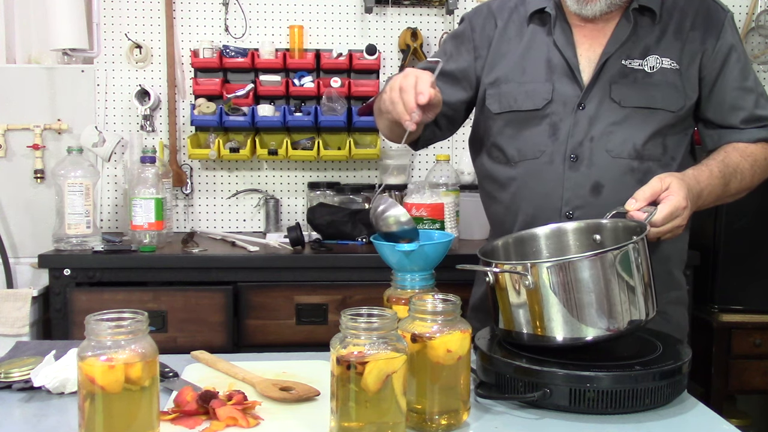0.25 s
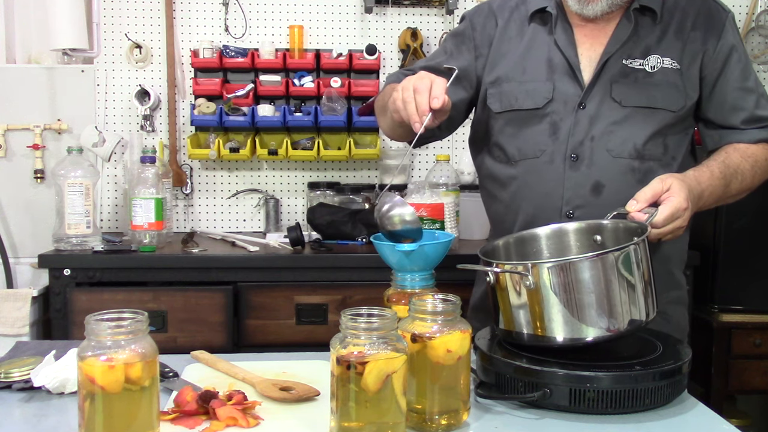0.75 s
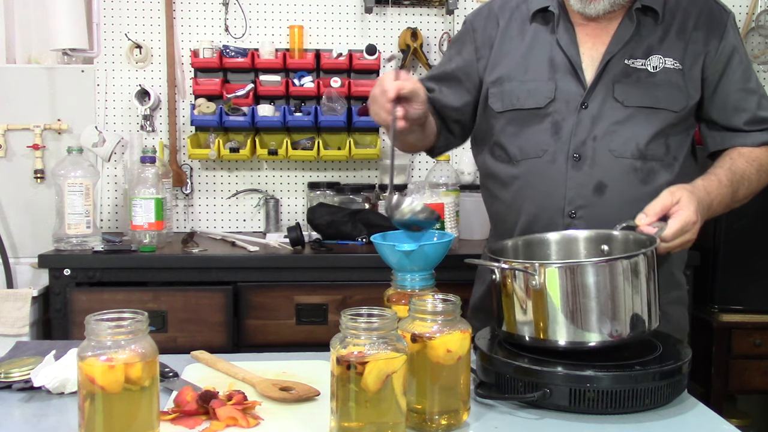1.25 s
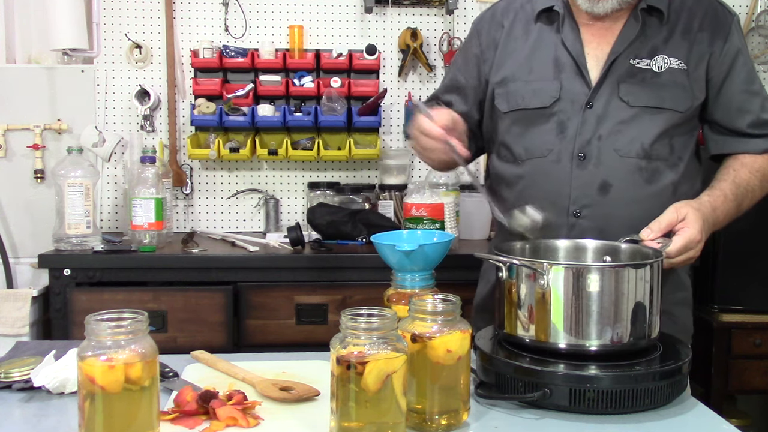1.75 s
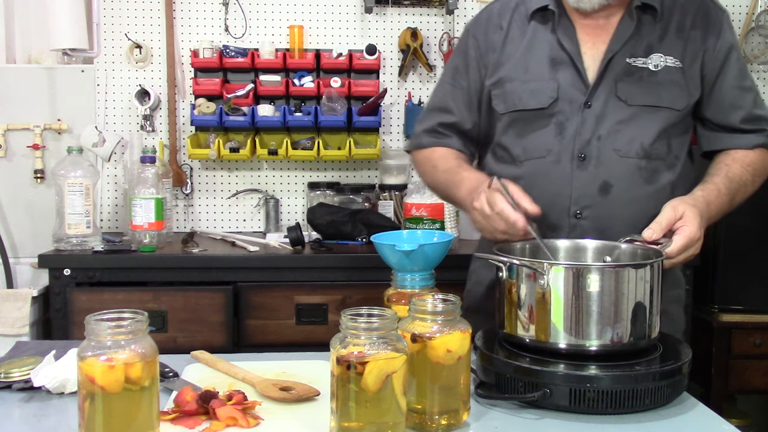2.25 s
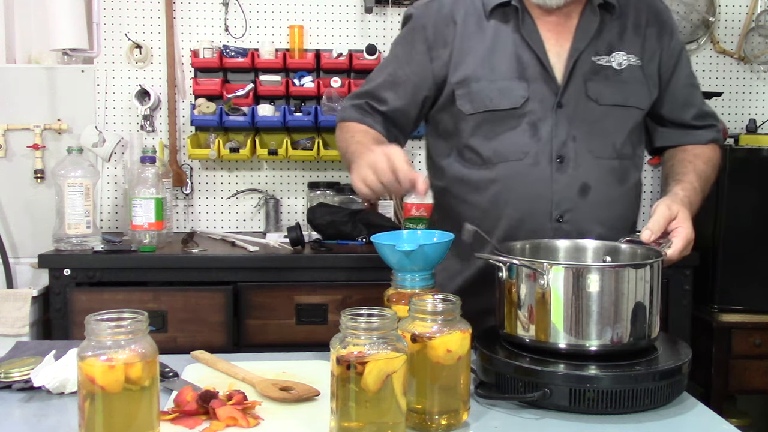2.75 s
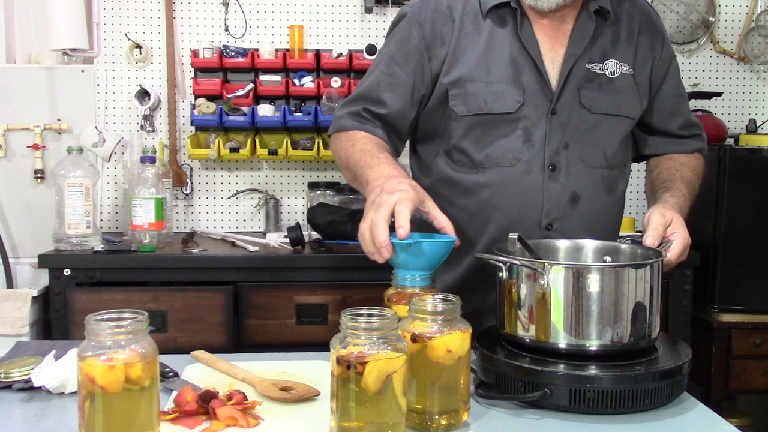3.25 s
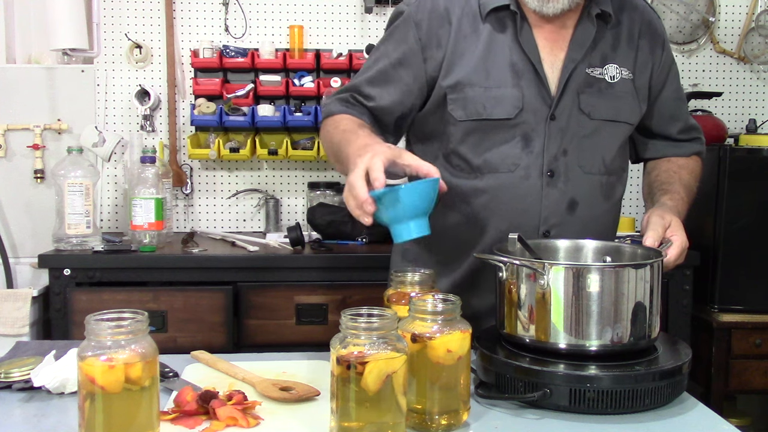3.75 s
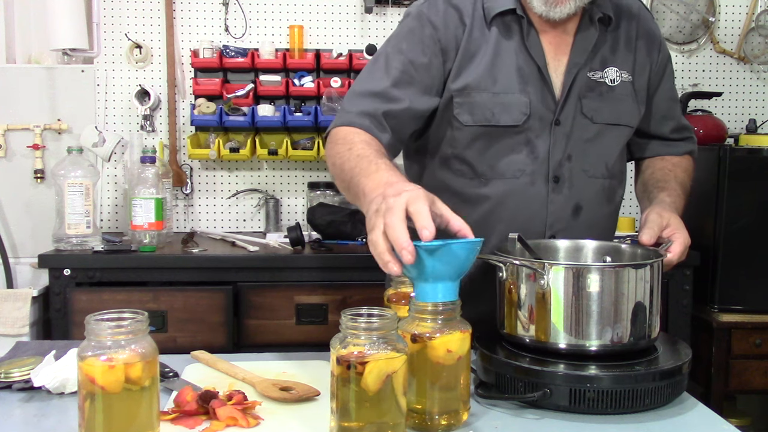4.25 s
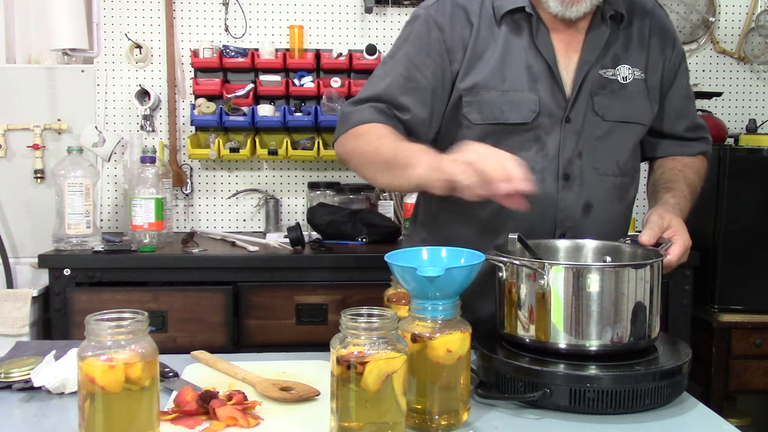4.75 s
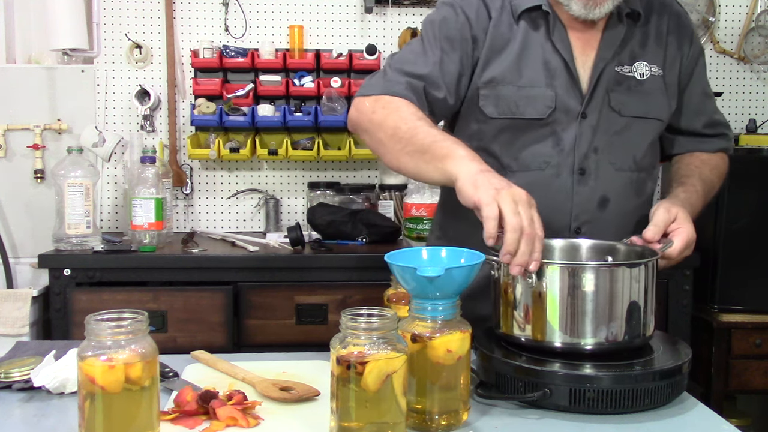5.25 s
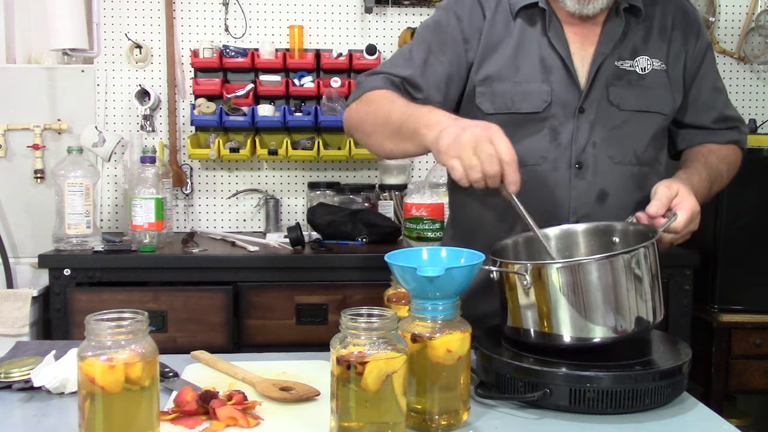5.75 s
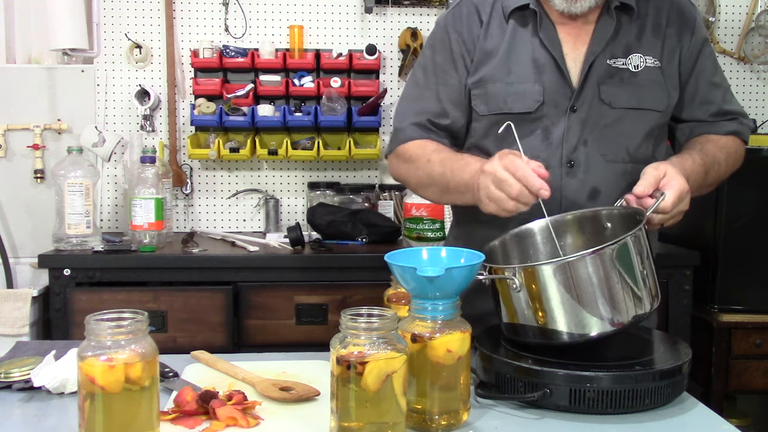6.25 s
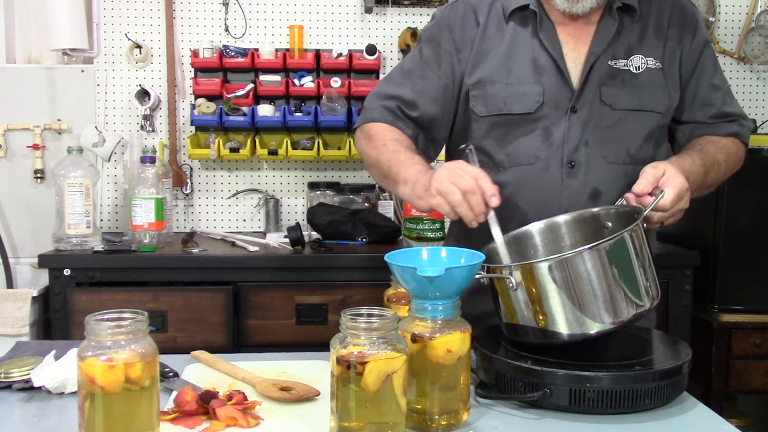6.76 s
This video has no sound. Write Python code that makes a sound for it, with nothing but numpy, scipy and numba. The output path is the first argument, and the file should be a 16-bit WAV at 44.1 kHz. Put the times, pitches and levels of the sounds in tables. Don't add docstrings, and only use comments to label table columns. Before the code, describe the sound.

A close microphone in a small, hard workshop hears low room hum and very faint distant engine notes, one rising during the first two seconds. Until 2.1 s, a thin fizz and soft burble slowly fade, with tiny metallic nudges and rubs near 0.1, 0.3-0.5, 0.9 and 1.5 s. At 2.1 s a steel pot lands on its hob, the loudest blow, with a low ring. A brief grind at 2.4 s leads to a ladle striking the wall at 2.53, bouncing and sliding, then clanging brightly on the rim at 2.8. Faint plastic stirs at 3.2-3.4. Dull hollow knocks on a glass jar come at 4.1, 4.2 and 4.3, settling by 4.5. A tiny squeak at 5.05 and light taps precede quiet rasping drags from 5.4 to 6.15, resonances rising as the pot tips. A bright knock rings at 6.43, a lower one at 6.73, then scraping to about 6.95.

```python
import sys
import numpy as np
from scipy import signal
from scipy.fft import rfft, irfft
from scipy.io import wavfile
from numba import njit

SR = 44100
rng = np.random.default_rng(int(sys.argv[2]) if len(sys.argv) > 2 else 0)


def invert_db(level):
    return 10 ** (np.asarray(level, dtype=float) / 20)


def put_to_file(sound):
    columns = np.atleast_2d(sound).T
    safe = np.clip(columns, -1, 1)
    whole_steps = np.round(safe * 32767)
    wavfile.write(sys.argv[1], SR, whole_steps.astype(np.int16))


N = 309141

# t/s, peak level/dB, brightness/(dB per octave)
SET_DOWN = [
    (2.104, 0, 2),
]
# f/Hz, level/(dB per Hz)
BASE_DIN = [(88, -72), (150, -42), (296, -25.5), (420, -7), (681, -7), (2100, -24), (7130, -25.5),
            (15500, -41.5)]
SCOOP_DIN = [(150, -66), (250, -48), (378, -17.5), (1550, -19), (1780, -13), (2240, -23.5), (9390, -30.5),
             (15500, -75)]
RASP = [(350, -48), (600, -15), (930, -15.5), (1410, -26), (1580, -14.5), (2310, -21.5), (6400, -13.5),
        (15500, -35)]
BAND_EDGES = 24 * 2 ** np.arange(0, 9.5, 1 / 3)
BAND_HZ = np.sqrt(BAND_EDGES[1:] * BAND_EDGES[:-1])


def rms_one(x):
    return x / np.sqrt(np.mean(x ** 2) + 1e-20)


def filtered(x, order, hz, kind):
    return signal.sosfilt(signal.butter(order, hz, kind, fs=SR, output="sos"), x)


def at_hz(points, hz):
    table_hz, value = np.transpose(points)
    return np.interp(np.log(hz), np.log(table_hz), value)


def drift(rate):
    r = np.exp(-80 * np.pi * rate / SR)
    white = rng.standard_normal(N // 40 + 2002)
    slow = rms_one(signal.lfilter([1], [1, -2 * r, r * r], white)[2000:])
    return np.interp(np.arange(N) / 40, np.arange(len(slow)), slow)


def bands(white):
    edges = zip(BAND_EDGES, BAND_EDGES[1:])
    return np.array([filtered(white[k % 2], 2, edge, "band") for k, edge in enumerate(edges)])


def band_gains(spectrum):
    gains = invert_db(at_hz(spectrum, BAND_HZ))
    return gains / np.sqrt(np.sum(gains ** 2 * np.diff(BAND_EDGES)) * 2.2 / SR)


def grit(per_s, spread_db):
    sizes = invert_db(spread_db * np.minimum(rng.exponential(1, (2, N)), 5))
    sizes = sizes * rng.choice([-1, 1], (2, N))
    return rms_one(sizes * (rng.random((2, N)) < per_s / SR))


def crowded(white):
    spacing_hz, width_hz = 60.5, 4.6
    hz = np.fft.rfftfreq(N, 1 / SR)
    lines = (rng.random(len(hz)) < hz[1] / spacing_hz) * invert_db(rng.normal(0, 4, len(hz)))
    offset = np.arange(-2000, 2001) * hz[1]
    resonance = 1 / (1 + (2 * offset / width_hz) ** 2)
    power = np.abs(signal.fftconvolve(lines, resonance, "same")) + 0.071
    return rms_one(irfft(rfft(white) * np.sqrt(power), N))


def blows(events, hz, luck_db=0):
    s, peak_db, *bright_db = np.transpose(events)
    clicks = np.full(N, 1e-18)
    level_db = peak_db + sum(bright_db) * np.log2(hz / 1500) + luck_db
    clicks[np.round(s * SR).astype(int)] = invert_db(level_db)
    return clicks


def ring(modes, forces, t0, t1, lasting=1):
    out = np.zeros(N)
    total = np.sqrt(np.sum(invert_db(np.array(modes)[:, 1]) ** 2))
    span = slice(int(t0 * SR) - 9, int((t1 + 1) * SR))
    for k, ((hz, level_db, t60), force) in enumerate(zip(modes, forces)):
        r, w = invert_db(-60 / (lasting * t60 * SR)), 2 * np.pi * hz / SR
        swing = signal.lfilter([0, np.sin(w)], [1, -2 * r * np.cos(w), r * r], force[span])
        out[span] += (-1) ** k * invert_db(level_db) / total * swing
    return out


def chime(events, modes, ring_db):
    forces = (blows(events, mode[0]) for mode in modes)
    return invert_db(ring_db) * ring(modes, forces, events[0][0], events[-1][0])


def decaying(energy, t60):
    return signal.lfilter([1], [1, -invert_db(-120 / (t60 * SR))], energy)


def struck(events, modes, din, noise, ring_db, din_db, lasting, ringing=0.94, crack_db=-6, swell=0):
    # f/Hz, t60/s
    din_t60 = [(200, 0.66), (1000, 0.52), (3000, 0.38), (7000, 0.34), (14000, 0.093)]
    crack_s, swell_s = 0.019, 0.04
    luck = rng.normal(0, 2.2, (len(events), len(modes)))
    luck[0] = 0
    forces = (blows(events, mode[0], luck_db) for mode, luck_db in zip(modes, luck.T))
    out = invert_db(ring_db) * ring(modes, forces, events[0][0], events[-1][0], ringing)
    span = slice(int(events[0][0] * SR) - 9, int((events[-1][0] + 1) * SR))
    for hz, gain, band in zip(BAND_HZ, band_gains(din), noise):
        energy = blows(events, hz)[span] ** 2 + 1e-18
        dying = decaying(energy, lasting * at_hz(din_t60, hz))
        dying -= swell * decaying(energy, swell_s)
        crack = invert_db(2 * crack_db) * decaying(energy, crack_s)
        out[span] += invert_db(din_db) * gain * np.sqrt(np.abs(dying) + crack) * band[span]
    return out


def strokes(s, hold_s, peak_db, rise_db_per_s, fall_db_per_s):
    late = np.arange(N) / SR - np.array(s)[:, None]
    fall_db = (late - np.array(hold_s)[:, None]) * fall_db_per_s
    loss_db = np.maximum(0, np.maximum(-late * rise_db_per_s, fall_db))
    level_db = np.array(peak_db)[:, None] - np.minimum(loss_db, 90)
    return np.sqrt(np.sum(invert_db(2 * level_db), axis=0))


def slide(rows, modes, din, scratch, ring_db, din_db):
    rubbed_t60_s, rise_db_per_s, fall_db_per_s = 0.12, 390.5, 167.5
    pressure = strokes(*np.transpose(rows), rise_db_per_s, fall_db_per_s)
    force = pressure * grit(per_s=1500, spread_db=3)[0]
    modes = [(hz, db, rubbed_t60_s) for hz, db in modes]
    rung = ring(modes, [force] * len(modes), rows[0][0] - .1, rows[-1][0])
    return invert_db(ring_db) * rung + invert_db(din_db) * pressure * (band_gains(din) @ scratch)


@njit
def gliding_mode(force, cosine, r):
    out = np.zeros(len(force))
    for i in range(2, len(force)):
        out[i] = force[i] + 2 * r * cosine[i] * out[i - 1] - r * r * out[i - 2]
    return out


def pot_set_down(steel):
    # f/Hz, level/dB, t60/s
    base_modes = [(320, 6, 1.0), (423, 1, 0.9), (509, -8, 0.45), (611, -14, 0.23), (775, -11, 0.45),
                  (832, -22, 0.3), (975, -13, 0.28), (1031, -11, 0.4), (1190, -19, 0.32), (1340, -16, 0.2),
                  (1604, -19, 0.24), (3593, -19, 0.2), (6350, -24, 0.29), (7017, -22, 0.23)]
    return struck(SET_DOWN, base_modes, BASE_DIN, steel, ring_db=-7.5, din_db=-16.0, lasting=0.7, ringing=0.78)


def ladle_dropped_in(steel, scratch):
    # t/s, peak level/dB, brightness/(dB per octave)
    drop_blows = [
        (2.53, -2, 1.5),
        (2.641, -13.5, 1.5),
        (2.676, -11.5, 0.035),
        (2.785, -5.5, 1),
        (3.016, -32, -1.4),
    ]
    # f/Hz, level/dB, t60/s
    loaded_modes = [(956, -2, 0.31), (1443, -6, 0.5), (3098, -6, 0.24), (3367, 1, 0.3), (3475, 2, 0.24),
                    (3596, -4, 0.31), (3663, -6, 0.34), (3814, -12, 0.34), (4105, -13, 0.34),
                    (4350, -11, 0.34), (6142, -11, 0.34), (6449, -2, 0.24), (6759, -12, 0.34),
                    (7364, -13, 0.24)]
    upright_modes = [(1809, 0, 0.34), (2132, 2, 0.45), (2665, -5, 0.34), (3095, 1, 0.6), (3277, -2, 0.62),
                     (3338, -1, 0.34), (3478, -2, 0.24), (3564, 4, 0.24), (3723, -1, 0.34),
                     (4250, -1, 0.32), (5227, -5, 0.15), (5830, -4, 0.28), (6290, -1, 0.12),
                     (5960, -2, 0.1)]
    # f/Hz, level/(dB per Hz)
    drop_din = [(190, -40), (315, -11), (596, -11.5), (1060, -7), (2200, -14), (3480, -6.5), (7000, -8),
                (15500, -24)]
    rim_din = [(190, -40), (315, -9), (596, -11.5), (1060, -8), (2200, -8.5), (3480, -6.5), (6500, -7),
               (15500, -26)]
    # t/s, peak level/dB
    belly_blow = [
        (2.53, -9),
        (2.6831, -6.5),
        (2.8363, -8),
    ]
    # f/Hz, level/dB, t60/s
    belly_modes = [(316.75, 0, .75), (323.25, 0, .75), (428, -9, .3), (1032, -6, .25)]
    # t/s at full pressure, hold/s, level/dB
    slide_rows = [
        (2.084, .01, -44.5),
        (2.42, 0.023, -49.5),
        (2.58, .005, -19.5),
        (2.645, .015, -22),
        (2.68, 0.008, -18),
        (2.73, .03, -26),
    ]
    # f/Hz, level/dB
    rubbed_modes = [(1015, 0), (1322, -9), (1440, -9), (1733, -12), (3095, -9), (3346, -7), (3601, -6),
                    (4266, -9), (4430, -12), (4616, -12), (5483, -14), (5642, -17), (6019, -13),
                    (8492, -19)]
    belly_force = blows(belly_blow, 1500)
    return (struck(drop_blows[:3], loaded_modes, drop_din, steel, ring_db=-9, din_db=-13.0, lasting=0.45,
                   ringing=1.1, crack_db=-10, swell=.7)
            + struck(drop_blows[3:], upright_modes, rim_din, steel, ring_db=-4.5, din_db=-10.0, lasting=1.1,
                     ringing=0.65, crack_db=-10, swell=.7)
            + invert_db(-16.5) * ring(belly_modes, [belly_force] * len(belly_modes), 2.5, 3.1)
            + slide(slide_rows, rubbed_modes, drop_din, scratch, ring_db=-25.5, din_db=-3.0))


def scoops(steel, scratch):
    # t/s, peak level/dB, then brightness/(dB per octave) for the second
    first = [
        (6.4225, -12),
        (6.4275, -7),
        (6.4365, -12),
        (6.4435, -19),
        (6.467, -24),
    ]
    second = [
        (6.727, -6.5, 3),
        (6.751, -8.5, -1),
    ]
    # f/Hz, level/dB, t60/s
    tipped_modes = [(1435, -6, 0.29), (1686, 5, 0.22), (1801, 4, 0.2), (2139, 0, 0.25), (2187, 3, 0.34),
                    (2704, 2, 0.42), (2995, -5, 0.33), (3254, -5, 0.26), (3461, 2, 0.28), (3556, 5, 0.24),
                    (3812, 1, 0.32), (3958, 0, 0.26), (4155, -1, 0.27), (4413, -3, 0.3)]
    scooped_modes = [(366, -10, 0.5), (442, -9, 0.8), (670, -7, 0.3), (740, -10, 0.4), (947, -10, 0.4),
                     (1190, -11, 0.3), (1390, 4, 0.9), (1690, -11, 0.3), (1758, 7, 0.4), (2064, 1, 0.2),
                     (2511, -2, 0.25), (3125, -10, 0.4), (3271, -7, 0.34), (4180, -9, 0.16)]
    settling_modes = [(367, -11, .6), (447, -7, .8), (632, -1, .35), (946, -4, .3), (1188, -13, .45),
                      (1417, -4, .4), (2430, -4, .45), (2520, -10, .3), (3074, -9, .4), (3270, -8, .25),
                      (3760, -10, .2), (4037, -10, .22), (4527, -14, .3), (5900, -16, .2)]
    # f/Hz, level/(dB per Hz)
    first_din = [(150, -51), (330, -9), (600, -17), (1300, -13), (1850, 1.5), (2550, -17), (3800, -1),
                 (15500, -40)]
    # t/s at full pressure, hold/s, level/dB
    slide_rows = [
        (6.676, 0.031, -33),
        (6.8, 0.067, -28.5),
        (6.885, 0.02, -20.5),
    ]
    # f/Hz, level/dB
    rubbed_modes = [(439, 0), (1435, -5), (1688, -8), (2048, -9), (3001, -5), (3071, -6), (3241, -3),
                    (3437, -2), (3550, -8), (3610, -8), (3782, -8), (4161, -7), (4482, -6), (5784, -9)]
    return (struck(first[:1], tipped_modes, first_din, steel, ring_db=-1.5, din_db=-11.5, lasting=0.74,
                   ringing=0.88, crack_db=-14, swell=.7)
            + struck(first[1:], tipped_modes[6:], first_din, steel, ring_db=-19, din_db=-20.5, lasting=1.0,
                     ringing=0.32)
            + struck(second[:1], scooped_modes, SCOOP_DIN, steel, ring_db=-6.0, din_db=-14.0, lasting=0.7,
                     ringing=0.79)
            + struck(second[1:], settling_modes, SCOOP_DIN, steel, ring_db=-12.0, din_db=-16.5, lasting=0.71,
                     ringing=0.91, crack_db=-15)
            + slide(slide_rows, rubbed_modes, RASP, scratch, ring_db=-30.0, din_db=-9.0))


def funnel_and_jar(noise):
    # t/s, peak level/dB, brightness/(dB per octave)
    knock = [
        (4.116, -12.5, 0),
        (4.209, -16, 1.5),
        (4.222, -23, -3),
        (4.313, -19.5, 5),
        (4.3205, -23, -1.5),
        (4.322, -53, 6),
        (4.390, -29.5, -2.5),
        (4.406, -43.5, 13),
        (4.487, -40, 2.5),
    ]
    lift = [
        (3.172, -47, -6),
        (3.290, -37, -3.5),
        (3.39, -47, 5),
    ]
    # f/Hz, level/dB, t60/s
    funnel_modes = [(190, -7.5, 0.58), (318, 4.5, 0.65), (509, -8, 0.73), (578, 2, 0.23), (726, -26, 0.28),
                    (829, -6.5, 0.81), (959, 7.5, 0.098), (1034, 7.5, 0.062), (1145, -9, 0.19),
                    (1330, -13, 0.17), (3285, -7, 0.087), (3460, -2.5, 0.11), (3600, -8, 0.077),
                    (5100, -10.5, 0.14)]
    jar_modes = [(2430, -6, .08), (2670, -8, .04), (3260, -6, .3), (3435, 3, .25), (3494, -3, .2),
                 (3752, -2, .17), (3924, -10, .3), (4613, -14, .2), (5045, -11, 0.34), (6541, -11, .25)]
    # f/Hz, level/(dB per Hz)
    funnel_din = [(120, -21), (250, -7.5), (850, -9), (1800, -31), (3300, -17), (4500, -27.5), (8700, -34),
                  (15000, -90)]
    return (struck(knock, funnel_modes, funnel_din, noise, ring_db=-9.5, din_db=-18.0, lasting=0.94, crack_db=11.5)
            + chime(knock[:5], jar_modes, ring_db=-24.0)
            + struck(lift, funnel_modes, funnel_din, noise, ring_db=-13.0, din_db=-11.5, lasting=0.56,
                     ringing=0.91))


def tipped():
    start_s, length_s = 5.76, .36
    return np.clip((np.arange(N) / SR - start_s) / length_s, 0, 1)


def tipping(modes, force):
    out, tip = np.zeros(N), tipped()
    for level_hz, tipped_hz, level_db, t60 in modes:
        r, w = invert_db(-60 / (t60 * SR)), 2 * np.pi * (level_hz + (tipped_hz - level_hz) * tip) / SR
        wander = invert_db(1.5 * drift(7))
        push = force * wander * np.sin(w) * np.sqrt(1 - r * r)
        out += invert_db(level_db) * gliding_mode(push, np.cos(w), r)
    return out


def drag(scratch):
    # t/s at full force, hold/s, weight level/dB on the bottom, slip level/dB of the edge
    shoves = [
        (5.43, 0.014, -51, -49),
        (5.501, 0.1, -46.5, -43),
        (5.653, 0.031, -45.5, -39.5),
        (5.839, 0.028, -38.5, -58),
        (5.969, 0.0089, -42.5, -46.5),
        (6.133, 0.035, -58, -53.5),
    ]
    # f/Hz level, f/Hz tipped, level/dB, t60/s
    bottom_modes = [(380, 368, -12, .2), (437, 440, 0, .15), (490, 488, -9, .2), (650, 700, -14, .15)]
    wall_modes = [(965, 960, -8, .14), (1020, 1198, -1, .18), (1254, 1400, -5, .45),
                  (1530, 1762, -4.5, .25), (1820, 1995, -9, .2), (2100, 2400, -9, .15)]
    rim_modes = [(2880, 3150, -9, .2), (3558, 3690, -5, .2), (4062, 4300, -7, .2), (5588, 5760, -9, .08),
                 (6417, 6550, -7, .07), (7031, 7200, -9, .2)]
    rise_db_per_s, fall_db_per_s, wall_freed_db = 245, 173, 8
    s, hold_s, weight_db, slip_db = np.transpose(shoves)
    bottom, wall, rasp = (strokes(s, hold_s, db, rise_db_per_s, fall_db_per_s)
                          for db in (weight_db, (weight_db + slip_db) / 2, slip_db))
    wall = wall * invert_db(wall_freed_db * tipped())
    rub = grit(per_s=2500, spread_db=2.5)
    return (invert_db(2.0) * tipping(bottom_modes, bottom * rub[0])
            + invert_db(-4.5) * tipping(wall_modes, wall * rub[1])
            + invert_db(-3.5) * tipping(rim_modes, rasp * rub[0])
            + invert_db(1.0) * rasp * (band_gains(RASP) @ scratch))


def catches(white):
    # t/s, hold/s, level/dB, f/Hz at start, f/Hz at end
    catch_rows = [(0.394, 0.059, -59.5, 1666, 1640), (0.498, 0.52, -64, 437, 430),
                  (0.895, 0.015, -63, 1400, 1390), (2.673, 0.025, -35, 3620, 3590),
                  (2.678, 0.04, -31, 1007, 1025), (2.682, 0.012, -32, 5640, 5490), (2.655, .012, -33, 6020, 5950),
                  (2.678, .015, -36, 8450, 8500), (2.558, 0.054, -35, 450, 425), (2.74, 0.015, -39, 400, 428),
                  (2.799, 0.031, -36, 355, 385), (5.49, .03, -44, 1030, 1000), (5.542, 0.083, -42, 1030, 985),
                  (5.622, 0.043, -46, 1507, 1545), (5.527, 0.045, -52, 2066, 2110),
                  (5.486, 0.053, -52, 1835, 1850), (5.666, .1, -60, 2470, 2490), (5.805, 0.052, -39.5, 453, 410),
                  (5.795, 0.254, -55, 1280, 1385), (5.835, 0.055, -50, 620, 655), (5.9, 0.16, -56, 1580, 1720),
                  (5.946, 0.027, -58, 2360, 2325), (5.959, 0.082, -53.5, 434, 460), (6.042, 0.077, -51, 750, 795),
                  (6.6, 0.12, -54, 1980, 2000), (2.545, 0.046, -22, 3420, 3367), (2.791, 0.041, -26, 3666, 3623),
                  (4.138, 0.074, -32, 326, 313), (5.054, 0.052, -69, 5030, 5140), (5.494, 0.066, -47.5, 343, 375),
                  (5.786, 0.11, -47.5, 1024, 1055), (5.62, 0.11, -54, 1250, 1262), (5.55, .2, -59, 2760, 2940),
                  (6.856, .06, -37, 3450, 3480), (6.875, .03, -40, 3900, 4330), (6.857, 0.052, -37, 3335, 3156),
                  (6.895, 0.053, -41, 2976, 2997), (6.745, 0.061, -36.5, 3290, 3140),
                  (6.95, .05, -45.5, 4470, 4450),
                  (3.018, .04, -50, 1030, 1020),
        (3.02, .04, -52, 1850, 1840),
        (5.945, .05, -52, 3000, 3030),
        (5.95, .04, -54, 4760, 4790),
        (5.955, .04, -56, 4220, 4240),
        (6.125, .03, -52, 1390, 1400),
        (0.06, 0.1, -70, 2060, 2076),
        (0.36, .14, -63, 2065, 2076),
        (0.01, .05, -66, 900, 880),
        (0.3, 0.1, -68, 1030, 1065),
    ]
    t60_s, rise_db_per_s, fall_db_per_s = 0.16, 1600, 299.5
    out, r = np.zeros(N), invert_db(-60 / (t60_s * SR))
    for s, hold_s, db, start_hz, end_hz in catch_rows:
        span = slice(max(int((s - .1) * SR), 0), int((s + hold_s + .5) * SR))
        hz = np.interp(np.arange(N)[span] / SR, [s, s + hold_s], [start_hz, end_hz])
        w = 2 * np.pi * hz / SR
        grip = strokes([s], [hold_s], [db], rise_db_per_s, fall_db_per_s)[span]
        push = grip * white[span] * np.sin(w) * np.sqrt(2 - 2 * r * r)
        out[span] += gliding_mode(push, np.cos(w), r)
    return out


def ladle_tapped(steel):
    # t/s, peak level/dB, brightness/(dB per octave)
    taps = [
        (5.33, -46.5, 1.1),
        (5.338, -45.5, 0.68),
        (5.547, -39, .1),
        (5.937, -47, 3.6),
        (5.9485, -41, 6),
        (6.0905, -38, 4.6),
        (6.0955, -37, 3.9),
        (6.103, -41, 0.85),
        (6.289, -60, 2.1),
        (6.2989, -49.5, 5.5),
    ]
    # f/Hz, level/dB, t60/s
    ladle_modes = [(371, 2, 0.28), (794, -6, 0.3), (1198, -1, 0.45), (1386, -5, 0.3), (1995, -5, 0.34),
                   (2484, -7, 0.3), (3184, -1, 0.18), (3452, 4, 0.15), (3682, 1, 0.22), (4043, -1, 0.32),
                   (4608, -1, 0.17), (5505, -8, 0.2), (6503, -8, 0.16), (6660, -7, 0.16)]
    handle_modes = [(2702, -8, .4), (5050, -3, .12), (5620, -6, .15), (7030, -8, .15), (7880, -5, .12),
                    (8280, -8, .15), (8850, 1, .14), (10100, -8, .07), (10800, -10, .1)]
    # f/Hz, level/(dB per Hz)
    tap_din = [(290, -38), (500, -6), (1990, -3.5), (2890, -26), (3580, 2), (4310, -8), (9110, -17),
               (15500, -38)]
    return (struck(taps, ladle_modes, tap_din, steel, ring_db=-4, din_db=-13, lasting=0.89, ringing=1.0,
                   crack_db=-20)
            + chime(taps[5:8], handle_modes, ring_db=-16.5))


def grind_and_squeak(scratch):
    # f/Hz, level/dB
    grind_rows = [
        (2.41, 0.059, -40),
    ]
    grind_modes = [(430, 4), (800, -2), (1000, 0.5), (1200, -4.5), (1800, -10.5)]
    squeak_rows = [
        (5.045, .02, -64),
        (5.065, 0.045, -61.5),
        (5.13, 0.024, -62.5),
    ]
    squeak_modes = [(800, 9), (2700, -1.5), (3105, -3.5), (5035, -2), (6350, -11.5)]
    return (slide(grind_rows, grind_modes, BASE_DIN, scratch, ring_db=-24.0, din_db=-5.0)
            + slide(squeak_rows, squeak_modes, RASP, scratch, ring_db=-21.0, din_db=-3.5))


def held_pot_nudged(steel):
    # t/s, peak level/dB, brightness/(dB per octave)
    nudges = [
        (0.123, -38, .1),
        (0.297, -42, 5),
        (0.41, -43, 5),
        (0.465, -43, 6),
        (0.895, -41, 1.5),
        (1.494, -46, 4),
    ]
    # f/Hz, level/dB, t60/s
    held_modes = [(426, 11.5, 0.75), (1060, 9, 0.58), (1870, 1, 0.3), (1700, -2, 0.17), (2076, 11, 0.22)]
    return struck(nudges, held_modes, SCOOP_DIN, steel, ring_db=-9, din_db=-14, lasting=.6, ringing=.5)


def fizz(scratch):
    # f/Hz, level/(dB per Hz)
    colour = [(600, -37.5), (1000, -6.5), (2900, -10), (3750, 1.5), (5300, -5), (6900, -7), (8400, -24),
              (14000, -38)]
    fizz_db, fizz_fade_db_per_s, burble_db, burble_fade_db_per_s = -50.5, 6, -57, 7
    t = np.arange(N) / SR
    patches = np.array([drift(11) for hz in BAND_HZ[::3]])
    patchy = invert_db(0.57 * patches.repeat(3, axis=0)[:len(BAND_HZ)])
    hiss = band_gains(colour) @ (scratch * patchy)
    hiss = hiss + invert_db(4) * signal.lfilter(*signal.iirpeak(6250, 6.5, fs=SR), hiss)
    burble = rms_one(filtered(grit(per_s=180, spread_db=-3.0)[0], 2, [140, 520], "band"))
    both = invert_db(fizz_db - fizz_fade_db_per_s * t) * hiss + invert_db(burble_db - burble_fade_db_per_s * t) * burble
    return (t < SET_DOWN[0][0]) * both


def workshop(x):
    t60_s, mid_db, side_db = 0.54, -14, -25.5
    t = np.arange(SR // 2) / SR
    tail = rng.standard_normal((2, len(t))) * (t > .004)
    dull = signal.lfilter([.4], [1, -.6], tail)
    late = dull * invert_db(-60 * t / t60_s) + 0.083 * tail * invert_db(-130 * t / t60_s)
    mid, side = rms_one(late) / np.sqrt(len(t))
    early = 11.0 * tail[1] * invert_db(-200 * t / t60_s) / np.sqrt(len(t))
    side = filtered(side + early, 2, 1800, "high")
    mid, side = (signal.fftconvolve(x, ir)[:N] for ir in (mid, side))
    return x + invert_db(mid_db) * mid, invert_db(side_db) * side


def traffic():
    # t/s, length/s, f/Hz at start, f/Hz at end, level/dB
    engine_notes = [
        (0, 1.9, 134.7, 209.9, -62.5),
        (0.142, 1.1, 228.8, 293, -63.5),
        (3.302, 1, 78.1, 79.6, -64.5),
        (4.651, 0.76, 168.7, 175.2, -65.5),
        (5.151, 0.9, 118.8, 115, -67),
    ]
    fade_db_per_s, waver_db = 37.5, 4
    out, t = 0, np.arange(N) / SR
    for s, length_s, start_hz, end_hz, db in engine_notes:
        hz = np.interp(t, [s, s + length_s], [start_hz, end_hz])
        level = strokes([s], [length_s], [db], fade_db_per_s, fade_db_per_s) * invert_db(waver_db * drift(4))
        out = out + level * np.sin(2 * np.pi * np.cumsum(hz) / SR)
    return out


def hum():
    # f/Hz, level/(dB per Hz)
    colour = [(15, -57), (25, -28), (80, -8.5), (293, -12), (430, -12.5), (754, -18), (4250, -29),
              (16000, -42.5)]
    # f/Hz, side minus mid level/dB
    width = [(60, -32), (180, -14), (550, -9.5), (1650, -11), (4970, -7.5), (15000, -10)]
    gains = band_gains(colour) * invert_db(-55)
    mid, side = (bands(rng.standard_normal((2, N))) for channel in range(2))
    return gains @ mid, (gains * invert_db(at_hz(width, BAND_HZ))) @ side


def scene():
    bass_cut_hz = 304
    steel = bands(crowded(rng.standard_normal((2, N))))
    scratch = bands(crowded(grit(per_s=2700, spread_db=3.5)))
    noise = bands(grit(per_s=5600, spread_db=3.0))
    pot = pot_set_down(steel) + ladle_dropped_in(steel, scratch) + scoops(steel, scratch)
    pot += drag(scratch + 0.29 * noise) + catches(rms_one(noise.sum(axis=0)))
    pot += ladle_tapped(steel) + grind_and_squeak(scratch) + held_pot_nudged(steel)
    pot = filtered(pot, 6, bass_cut_hz, "high")
    funnel = filtered(funnel_and_jar(noise), 4, .55 * bass_cut_hz, "high")
    bench = pot + funnel + fizz(0.62 * noise + 0.66 * scratch)
    mid, side = np.add(workshop(bench), hum())
    mid = mid + traffic()
    side = side - invert_db(-27) * filtered(mid, 1, 1300, "high")
    return np.array([mid + side, mid - side])


def roll_off(x):
    return signal.sosfilt(signal.butter(12, 16810, fs=SR, output="sos"), x)


def record(dry):
    headroom = 0.96
    rounded = headroom * np.tanh(dry / headroom)
    heard = filtered(rounded, 2, [45.4, 12500], "band")
    heard = signal.sosfilt(signal.cheby2(8, 40, 16900, fs=SR, output="sos"), heard)
    return roll_off(heard)


dry = scene()
out = record(dry)
put_to_file(out)
```